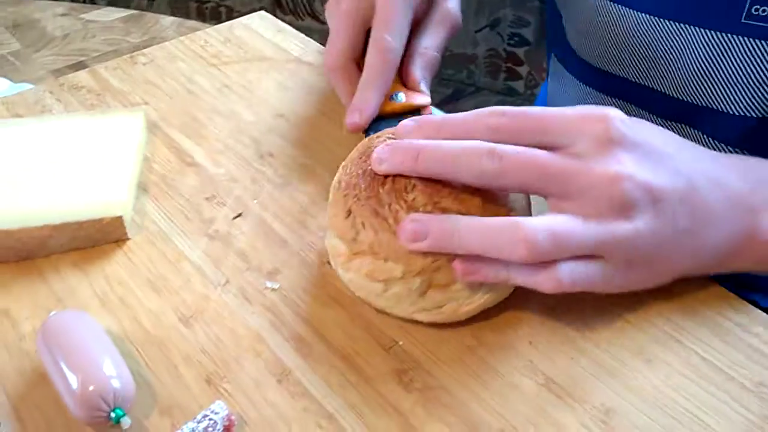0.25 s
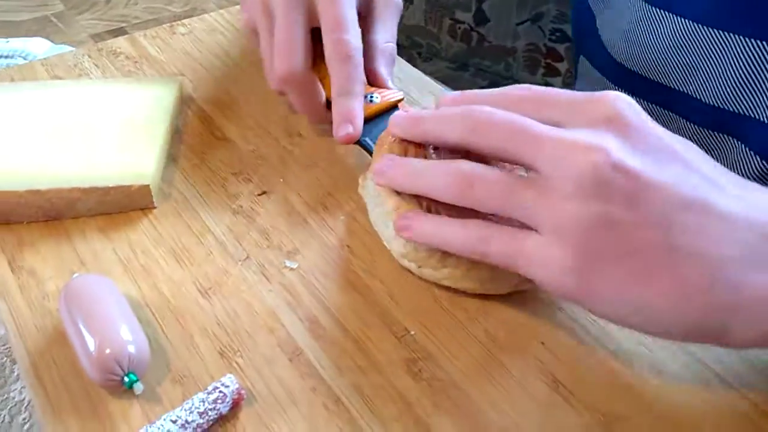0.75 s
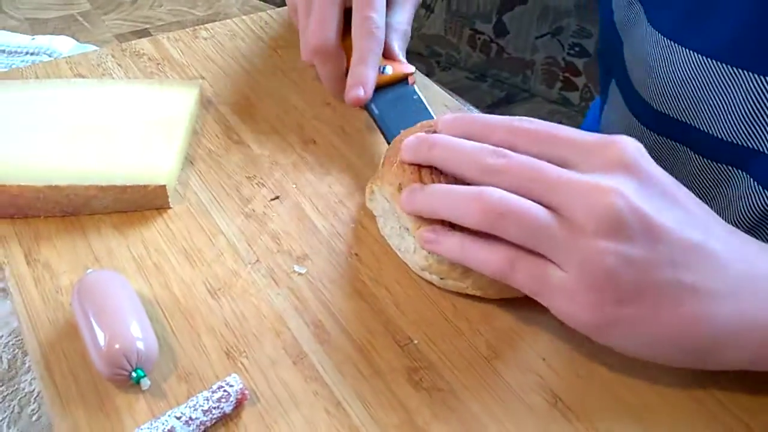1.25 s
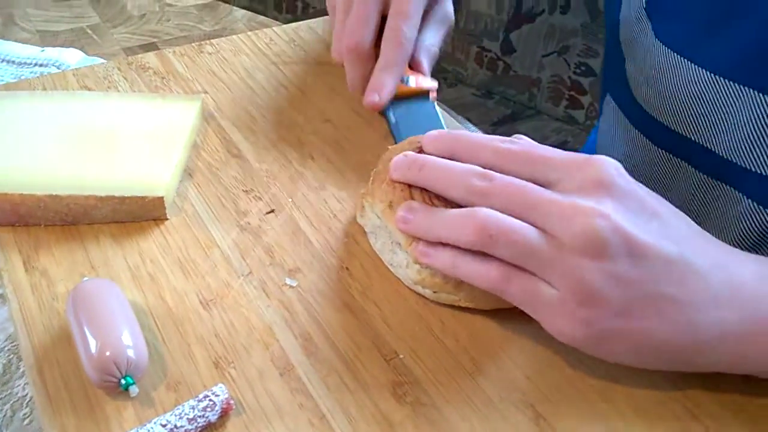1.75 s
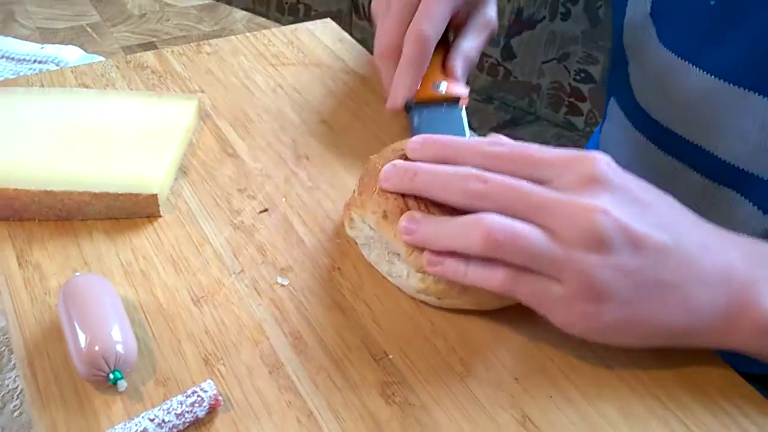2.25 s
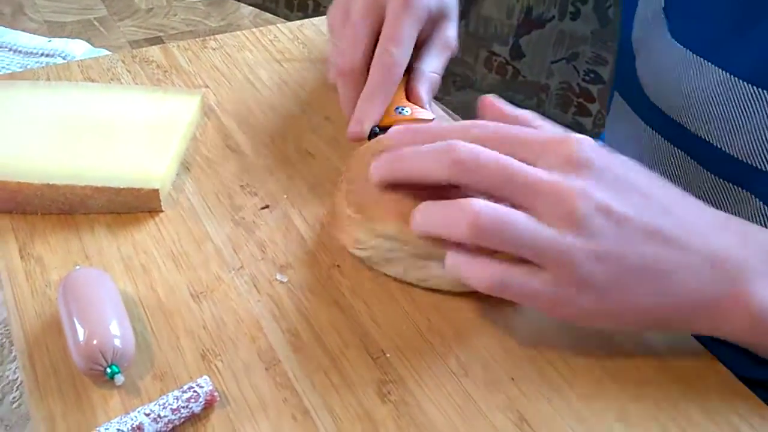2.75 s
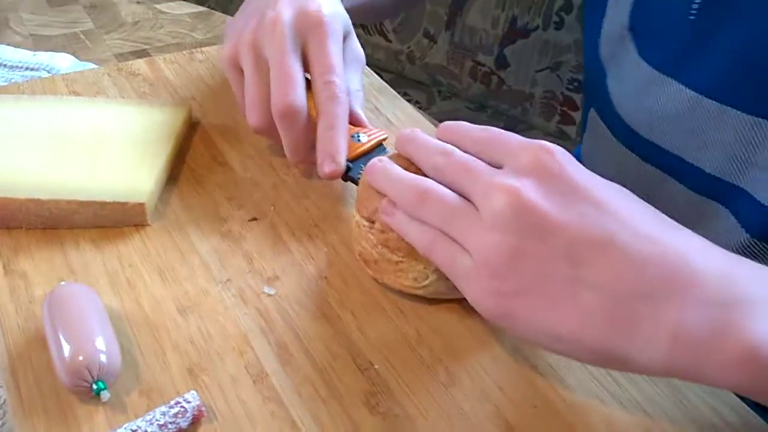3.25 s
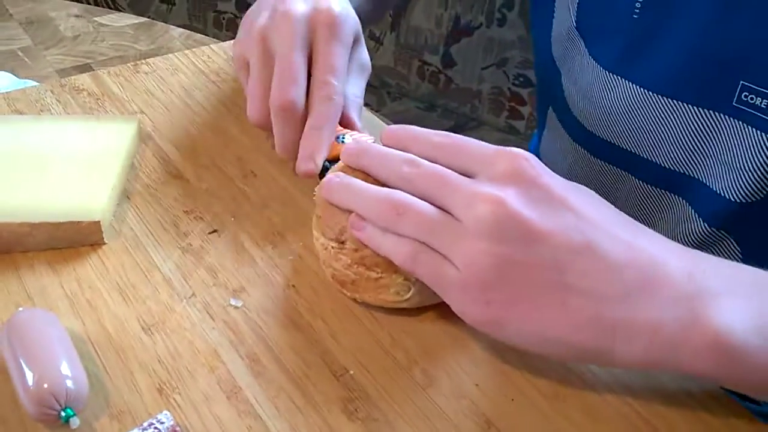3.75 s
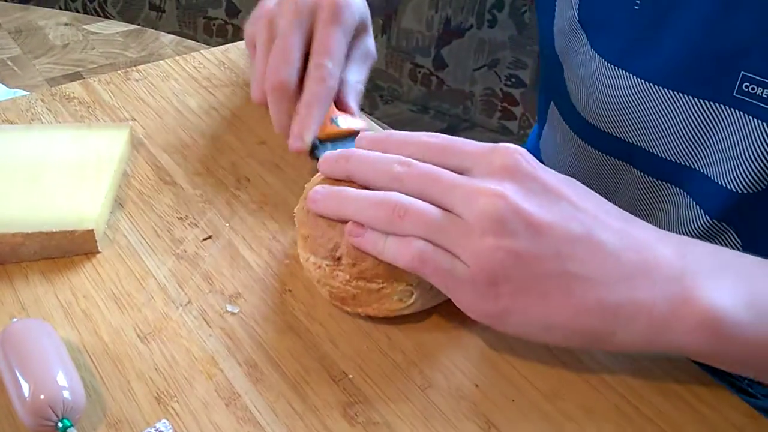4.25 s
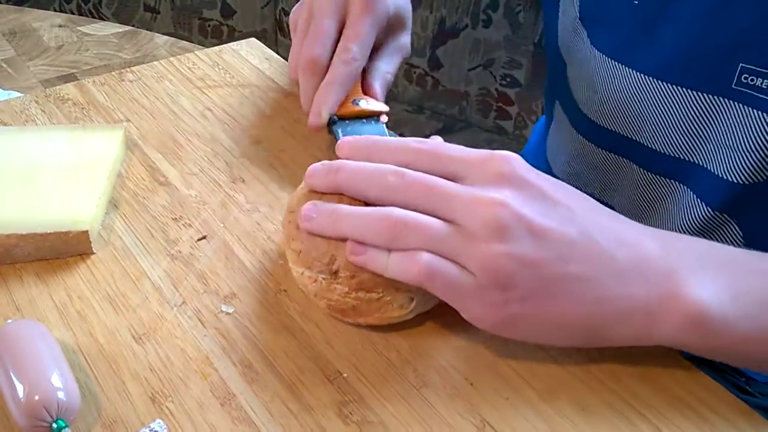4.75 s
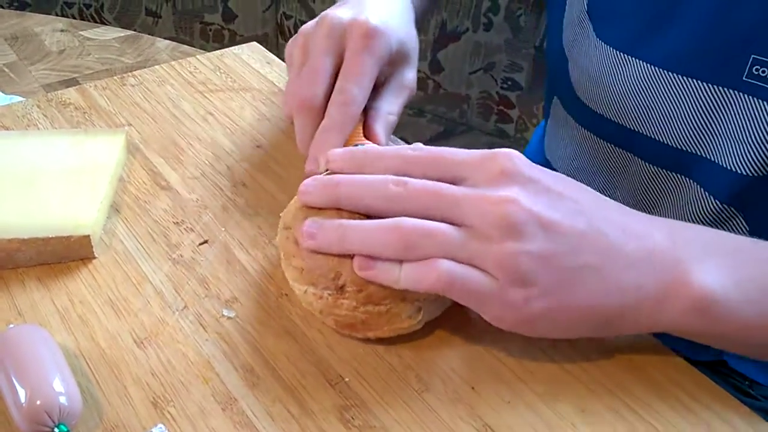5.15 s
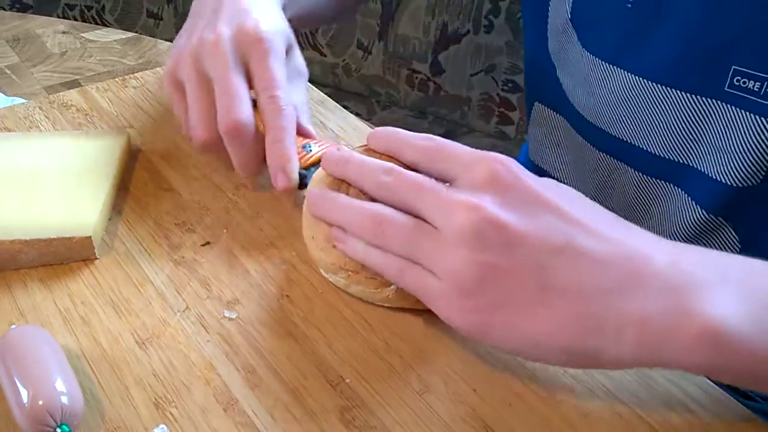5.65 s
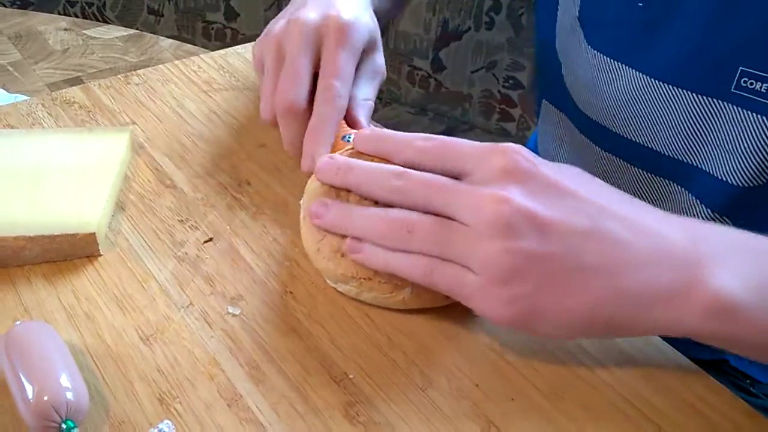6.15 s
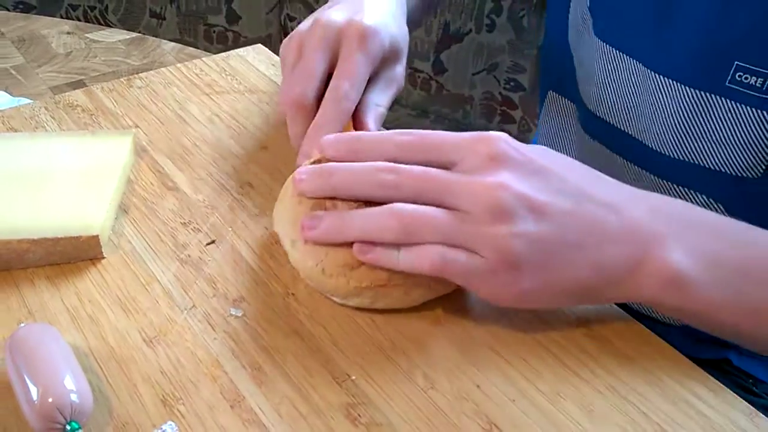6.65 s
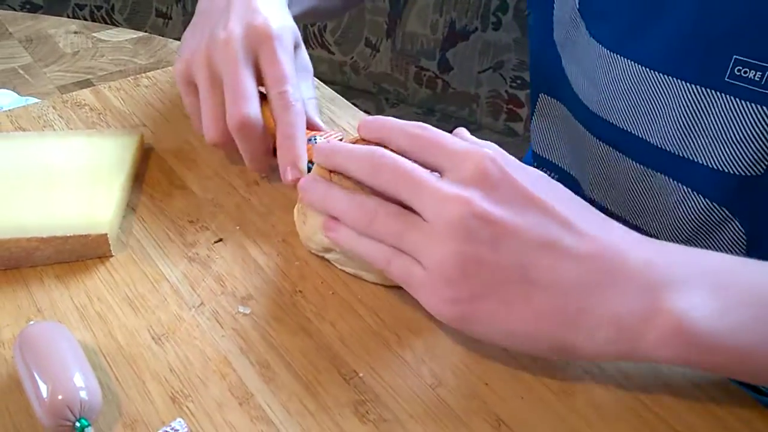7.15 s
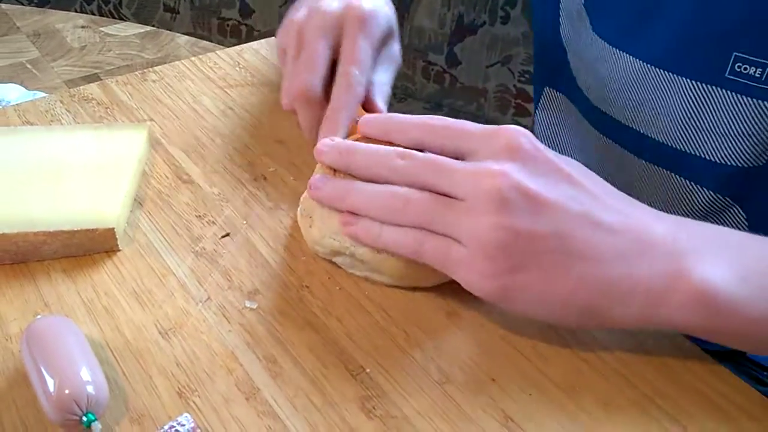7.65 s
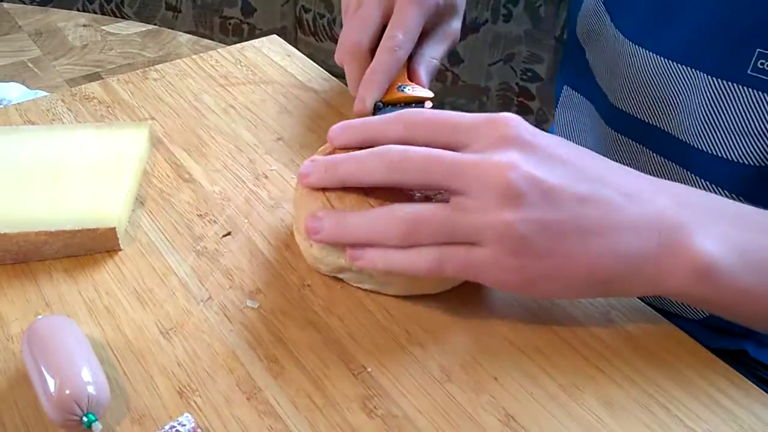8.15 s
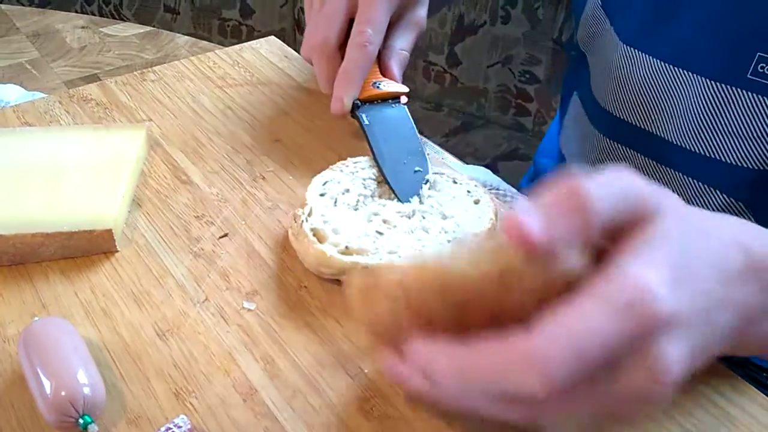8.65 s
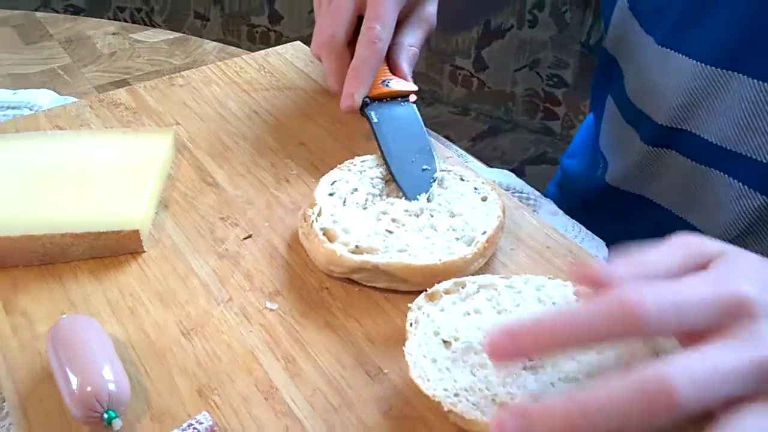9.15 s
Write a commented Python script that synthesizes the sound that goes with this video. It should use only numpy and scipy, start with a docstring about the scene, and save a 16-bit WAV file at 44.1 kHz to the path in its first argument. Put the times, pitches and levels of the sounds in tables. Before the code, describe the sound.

A serrated knife saws through a crusty bread roll on a wooden board in quick dry rasping strokes, with small creaks, crust snaps and short pauses.

```python
"""A serrated table knife saws a bread roll in half on a wooden board, in a small quiet room.
The teeth make a rasp, a hollow weight and a crust fizz: noise and tiny cracks, coloured and shaped stroke by stroke.
Slip pulses make short gliding creaks, narrow noise bands make scrapes, rubs and whistles, clicks make crust snaps.
Low dying tones are the hand and the roll bumping the board; faint reflections and a steady room tone sit around it."""
import sys
import numpy as np
from scipy import signal
from scipy.fft import rfft, irfft
from scipy.io import wavfile
from scipy.ndimage import uniform_filter1d, map_coordinates

SR = 44100
rng = np.random.default_rng(int(sys.argv[2]) if len(sys.argv) > 2 else 0)


def unload_audio(sound):
    """Save the sound as a 16-bit wav file, at the path given as the first command line argument."""
    columns = np.transpose(np.atleast_2d(sound))
    # keep every value between -1 and 1, then stretch to whole-number steps
    steps = np.round(np.clip(columns, -1, 1) * 32767)
    wavfile.write(sys.argv[1], SR, steps.astype(np.int16))


N = 414540
TIME = np.arange(N) / SR

# strokes of the blade, then the parting of the halves: (fastest moment [s], speeding up [s], slowing down [s],
# rasp level [dB], change of pressure over the stroke [dB], hollow weight of the roll relative to the rasp [dB],
# crust fizz relative to the rasp [dB], share of fine fizz [0-1]: 0 is all coarse fizz, 1 is all fine, bright fizz)
STROKES = [(0.092, 0.14, 0.088, -49.5, 5, -10.5, -11, 0.0), (0.25, 0.078, 0.22, -47, -2.5, -4, -4.5, 0.3),
           (0.694, 0.25, 0.12, -59.5, 10, -14, -1.5, 0.0), (0.938, 0.05, 0.067, -65.0, 2, -12, -7, 0.0),
           (1.088, 0.0071, 0.16, -65.5, 21.5, -7, 8, 0.3), (1.266, 0.14, 0.15, -49.5, -3, -14, -8, 0.0),
           (1.442, 0.045, 0.2, -48, 5, -13, 2, 0.38), (1.826, 0.25, 0.111, -47.5, 8, -11, -6.5, 0.31),
           (1.941, 0.048, 0.21, -46, 6, -13, -3, 0.36), (2.304, 0.189, 0.12, -48.0, -10, -13, -10, 0.0),
           (2.439, 0.042, 0.27, -44.0, -2, -19.5, -4.5, 0.51),
           (2.863, 0.24, 0.025, -56.5, 21, -15, -12.5, 0), (2.962, 0.24, 0.23, -66, 15, -12, -8, 0.8),
           (3.499, 0.22, 0.18, -51.5, -2, -20, -6, 0.43), (3.672, 0.048, 0.23, -46, -2.5, -14, -2, 0.45),
           (4.004, 0.12, 0.2, -54, 10, -10, -6.5, 0.36), (4.253, 0.07, 0.23, -42.5, 0, -13.5, -4.5, 0.56),
           (4.654, 0.22, 0.11, -47, -0.5, -11.5, -9, 0.0), (4.849, 0.14, 0.22, -42, -14, -15, -8.5, 0.11),
           (5.143, 0.193, 0.19, -71, -2, -12, -28, 0.0), (5.401, 0.132, 0.093, -53.5, 6, -16, -5.5, 0.0),
           (5.5, 0.032, 0.15, -60.5, 8, -13, -17, 0.3), (5.852, 0.23, 0.13, -49, 11.5, -17, -8, 0.15),
           (6.02, 0.11, 0.22, -45.5, -2, -12, -2.5, 0.2), (6.403, 0.22, 0.09, -46.0, 7, -10, -8.5, 0.24),
           (6.575, 0.138, 0.22, -48.5, -8.5, -9.5, -4, 0.25),
           (6.773, 0.028, 0.109, -54.5, -15, -10, -19, 0.5),
           (6.917, 0.065, 0.159, -54.5, -1, -16, -1.5, 0.0),
           (7.073, 0.04, 0.15, -65.5, -4.5, -16, -22, 0.2), (7.456, 0.22, 0.087, -51, -4, -14, -6.5, 0.12),
           (7.591, 0.11, 0.28, -54, 3.5, -8, -2.5, 0.34), (7.898, 0.078, 0.214, -56, 2, -11, -15, 1.0),
           (8.162, 0.056, 0.25, -65.5, 1, -13, -20, 0.3), (8.468, 0.008, 0.092, -78, 15, -13, -18, 0.1),
           (8.597, 0.023, 0.082, -63.5, -5, -14, 0.5, 0.47), (8.805, 0.165, 0.07, -59, 18, -20, -5, 0.075),
           (8.865, 0.008, 0.08, -58, 4, -21, -9, 0.0), (9.395, 0.039, 0.02, -54, 13, -24, -9, 0.0)]
# stick-slip creaks: (loudest moment [s], swell [s], fade [s], first slip rate [Hz], last slip rate [Hz],
# level [dB], roughness [0-1])
CREAKS = [ (.213, 0.0034, 0.0156, 259, 338, -41.5, .12), (.234, 0.02, 0.004, 368, 710, -30, 0.02),
          (.244, .006, 0.026, 595, 696, -46, 0), (.359, .007, 0.019, 291, 270, -42, 0.04),
          (1.336, 0.0073, 0.007, 1700, 1264, -41, 0.21), (1.426, 0.013, 0.017, 696, 1164, -37, 0.14),
          (1.682, 0.025, .012, 201, 338, -49.5, .1), (1.708, 0.022, .021, 449, 698, -43, 0.39),
          (1.851, 0.0075, 0.025, 996, 590, -35.5, .2), (1.946, 0.016, 0.0098, 1120, 1600, -42, 0.09),
          (2.051, 0.0041, 0.019, 1465, 1110, -43.5, 0.21), (2.453, 0.028, .016, 1287, 1423, -33.5, 0.08),
          (2.461, .015, 0.034, 604, 1450, -34, 0.06), (2.618, .014, 0.0067, 393, 172, -45.5, .25),
          (3.548, 0.015, 0.029, 1055, 546, -43, 0.33), (3.672, 0.019, 0.026, 898, 1600, -38.5, 0.28),
          (4.122, .008, 0.0085, 640, 538, -45, 0.23), (4.232, .005, 0.02, 995, 1260, -34.5, 0.2),
          (4.254, .020, .022, 261, 478, -34, 0.3), (4.292, .0055, 0.0104, 2326, 2250, -36, .1),
          (4.372, .0031, 0.0061, 612, 257, -39, 0.29), (4.641, .010, .034, 885, 607, -37.5, .14),
          (4.822, 0.057, .0093, 433, 1762, -35, 0.11), (4.857, .043, 0.00536, 675, 1556, -31.5, 0.09),
          (4.938, 0.014, 0.026, 454, 202, -45.5, 0.31), (5.847, 0.0053, 0.034, 1522, 616, -35, 0.06),
          (5.868, .011, 0.02, 2050, 1007, -36.5, 0.11), (5.986, .010, 0.024, 322.7, 414, -36.5, 0.3),
          (6.116, .003, 0.024, 345.3, 201, -41.5, 0.45), (6.409, 0.0058, .014, 1670, 760, -34, 0.06),
          (6.537, .016, 0.011, 453, 551, -36.5, .17), (6.666, .02, .03, 477, 260, -45.5, .35),
          (7.442, 0.012, 0.019, 1350, 1750, -42.5, 0.18), (7.553, 0.029, 0.021, 208.5, 431, -38, 0.13),
          (7.72, .012, 0.034, 486, 260, -46.5, 0.4)]
# short bursts of noise round one pitch, as crust scrapes, low rubs and knocks, high blade whistles:
# (loudest moment [s], length [s], pitch [Hz], level [dB])
NOISE_BURSTS = [(.09, .062, 3100, -48), (.134, .02, 1800, -50), (.65, .08, 2820, -61),
                (0.694, 0.04, 6600, -62), (1.49, 0.026, 9200, -48), (2.026, 0.12, 2250, -49),
                (2.891, 0.12, 900, -63.5), (3.681, .044, 2760, -42), (4.258, 0.042, 3400, -40),
                (4.667, 0.044, 3630, -45.5), (4.859, .019, 9600, -50), (5.876, 0.038, 2670, -49),
                (6.38, 0.13, 2650, -49), (7.448, 0.043, 3100, -47), (7.99, .03, 1600, -55),
                (8.396, .035, 660, -63), (8.882, 0.024, 2900, -59.5)]
# crust snaps: (time [s], peak level [dB], crispness [0-1])
SNAPS = [(0.534, -42, .3), (1.088, -47, 1), (1.63, -45, 0), (2.866, -43, 0.8), (3.279, -51, .3),
         (3.379, -44.5, 0), (4.219, -32, 0.4), (4.231, -32, .3), (4.434, -40.5, 0), (4.923, -32, .1),
         (5.283, -44, 0), (6.203, -45, 0.1), (7.239, -51, .6), (7.878, -42, .3), (7.975, -35, 0),
         (8.249, -51, 0.6), (8.382, -47, 0.76), (8.793, -34.5, .3)]
# bumps on the board: (time [s], level [dB], settled pitch [Hz], t60 [s])
BUMPS = [(0.767, -45.5, 46.4, 0.26), (3.056, -49, 56, 0.17), (3.079, -30, 41.3, 0.22),
         (3.155, -39, 33.2, 0.36), (3.194, -52, 110, 0.07), (3.806, -46, 85.5, 0.1), (4.99, -45, 55, 0.1),
         (5.598, -46, 43.7, 0.22), (6.123, -43.5, 92, 0.2), (6.146, -40.5, 42.4, 0.27),
         (8.776, -46, 46.4, 0.62), (9.136, -41.5, 91, 0.05)]
# resonances of roll, blade and board: (centre [Hz], width [Hz], lift [dB])
BODY_RESONANCES = [(270, 117, 6), (373, 72, 3), (521, 15, 7), (590, 13, -1), (640, 23, 1.5), (785, 25, 5.5),
                   (900, 117, 4), (1210, 58, 0), (1250, 120, 2), (1357, 68, 4.5), (1450, 49, 6),
                   (1537, 34, 4), (1600, 184, 7), (1705, 31, 4), (1925, 20, 6.5), (2066, 124, 3),
                   (2500, 38, 3), (2820, 63, 4.5), (3094, 87, 4), (3494, 140, 5), (3920, 220, 3),
                   (5380, 310, 3), (5960, 240, 4.5)]
# colour of the teeth in crust and crumb: (frequency [Hz], relative level [dB])
RASP_COLOUR = [(200, -48.5), (480, -13.5), (740, 1), (1100, 2), (1550, 0), (1800, 0.5), (2300, 1.5),
               (2650, -4.5), (3300, -10.5), (4000, -12.5), (5500, -19), (12000, -61)]
# colour of the hollow roll: (frequency [Hz], relative level [dB])
HOLLOW_COLOUR = [(100, -27.5), (180, -11), (270, -5), (450, -6.5), (560, -2.5), (680, 0), (900, -13),
                 (2500, -41.5)]
# colour of the coarse crust fizz: (frequency [Hz], relative level [dB])
COARSE_FIZZ_COLOUR = [(1200, -20.5), (2800, 7), (4000, -2.5), (5500, -1), (7300, -0.5), (9200, -1),
                      (10800, -13.5), (13000, -19), (16000, -24)]
# colour of the fine crust fizz: (frequency [Hz], relative level [dB])
FINE_FIZZ_COLOUR = [(1200, -24), (2500, -3), (4000, 2.5), (5500, -3), (7300, -2.5), (9100, 0.5),
                    (10500, -2), (12500, -7), (14000, -13), (16000, -25)]
# colour of the creaking blade: (frequency [Hz], relative level [dB])
CREAK_COLOUR = [(80, -22), (250, -5.5), (600, 4.5), (1000, 2.5), (1450, -0.5), (1900, -2.5), (2600, -7.5),
                (4000, -16.5), (9000, -16.5), (16000, -47)]
# colour of breaking crust: (frequency [Hz], relative level [dB])
SNAP_COLOUR = [(100, -34), (500, -2), (1000, 8.5), (1500, 7.5), (2500, -2.5), (4500, -7.5), (8000, -17),
               (16000, -28.5)]
# colour of the thrumming board: (frequency [Hz], relative level [dB])
THRUM_COLOUR = [(40, -19), (90, 5), (140, 8.5), (220, -9.5), (400, -44), (1500, -58)]
# colour of the room tone: (frequency [Hz], relative level [dB per Hz])
ROOM_TONE_COLOUR = [(12, -7.5), (20, 6.5), (52, 1.5), (129, -10), (282, -13.5), (465, -20.5), (881, -20.5),
                    (1200, -26.5), (1540, -26), (1870, -25.5), (2150, -25.5), (2540, -29.5), (5850, -28.5),
                    (7730, -39), (15500, -37.5)]
# decay of the reflections: (frequency [Hz], t60 [s])
ROOM_DECAY = [(150, 0.38), (1500, 0.16), (5000, 0.3), (14000, 0.017)]


def amp(db):
    """Decibels to gain."""
    return 10 ** (np.asarray(db) / 20)


def evened(x):
    """Scales to rms 1."""
    return x / np.sqrt(np.mean(x ** 2) + 1e-20)


def read(points, hz):
    """Reads a table along a log-frequency axis."""
    f, value = np.transpose(points)
    return np.interp(np.log(hz + 1), np.log(f + 1), value)


def add(mix, s, sound):
    """Mixes a sound in at time s."""
    part = mix[max(round(s * SR), 0):][:len(sound)]
    part += sound[:len(part)]


def wander(length, hz):
    """Smooth chance of rms 1 that changes about hz times a second."""
    at = np.arange(length) * hz / SR
    return evened(np.interp(at, np.arange(length), rng.standard_normal(length)))


def room_tone(level_db=-62):
    """Steady low rumble and faint hiss: noise given one fixed colour."""
    colour = amp(read(ROOM_TONE_COLOUR, np.fft.rfftfreq(N, 1 / SR)))
    noise = rng.standard_normal(N)
    return amp(level_db) * evened(irfft(rfft(noise) * colour, N))


def room(x, wet_db=-15, gap_s=0.0034):
    """Dense faint reflections off table and walls, the top treble dying first."""
    length = SR // 2
    taps = rng.standard_normal(length) * (TIME[:length] > gap_s)
    hz, t, bands = signal.stft(taps, SR, nperseg=256)
    decay = np.exp(-np.log(1000) * t / read(ROOM_DECAY, hz)[:, None])
    tail = signal.istft(bands * decay, SR)[1]
    return x + amp(wet_db) * signal.oaconvolve(x, tail / np.linalg.norm(tail))[:N]


def body(colour, size=4096):
    """Causal response to one click: a broad colour lifted at the resonances of roll, blade and board."""
    hz = np.fft.rfftfreq(size, 1 / SR)
    db = read(colour, hz)
    for f, width, lift in BODY_RESONANCES:
        db = db + lift / (1 + (2 * (hz - f) / width) ** 2)
    log_gain = np.log(amp(np.r_[db, db[-2:0:-1]]))
    minimum_phase = np.exp(np.conj(signal.hilbert(log_gain)))
    return np.fft.ifft(minimum_phase).real[:size // 2]


def ring(drive, colour):
    """Passes a drive through the body."""
    return signal.oaconvolve(drive, body(colour))[:len(drive)]


def bumps(rise_s=0.002, sag=0.85, sag_s=0.0073, knock=0.15, knock_s=0.008):
    """Board and table give a dull low shudder, stiffer and knocking for the first instant of contact."""
    out, t = np.zeros(N), np.arange(SR // 2) / SR
    for s, db, hz, t60 in BUMPS:
        # the pitch starts high and sags to its settled value
        turns = np.cumsum(hz * (1 + sag * np.exp(-t / sag_s))) / SR
        shudder = np.exp(-np.log(1000) * t / t60) * np.sin(2 * np.pi * turns)
        thud = evened(ring(rng.standard_normal(len(t)), THRUM_COLOUR))
        contact = knock * thud * np.exp(-t / knock_s)
        add(out, s, amp(db) * (1 - np.exp(-t / rise_s)) * (shudder + contact))
    return out


def snaps(splinter=0.27, spray_s=0.0014, size=2048):
    """A flake of crust breaks: one click and a quickly dying spray of splinters."""
    out, t = np.zeros(N), np.arange(size) / SR
    for s, db, crisp in SNAPS:
        spray = splinter * rng.standard_normal(size) * np.exp(-t / spray_s)
        snap = ring((t == 0) + spray, SNAP_COLOUR)
        snap = signal.lfilter([1, -np.clip(crisp, 0, 1)], [1], snap)  # dry, thin flakes have less bass
        add(out, s, amp(db) * snap / abs(snap).max())
    return out


def creaks(curve=0.86, uneven=0.73, jitter_hz=900, softest=0.79, sharpness=30, sharpest_hz=8000, size=8192):
    """The blade's flank sticks and slips in the crumb: one pulse a slip, at a gliding, jittery rate."""
    out, t = np.zeros(N), np.arange(size) / SR
    for s, swell, fade, first_hz, last_hz, db, rough in CREAKS:
        glide = np.interp(t, [0, swell + fade], [first_hz, last_hz])
        rate = glide * np.exp(rough * wander(size, jitter_hz))
        turns = np.cumsum(rate) / SR
        # each whole turn is one slip, placed between samples
        places = np.interp(np.arange(1, turns[-1]), turns, np.arange(size))
        places = places[places < (swell + fade) * SR]
        force = np.exp(uneven * rough * rng.standard_normal(size)[:len(places)])
        force *= np.interp(places / SR, [0, swell, swell + fade], [0, 1, 0]) ** (curve / 2)
        pulses = force @ np.sinc(np.arange(size) - places[:, None])
        slips = ring(pulses, CREAK_COLOUR)
        # fast, rough slips are the sharpest; soft crumb lets go slowly
        sharp_hz = min((softest + sharpness * rough) * (first_hz + last_hz) / 2, sharpest_hz)
        pole = np.exp(-2 * np.pi * sharp_hz / SR)
        slips = signal.lfilter([1], np.poly([pole, pole]), slips)
        loudest = np.sqrt(uniform_filter1d(slips ** 2, size=400).max())
        add(out, s - swell, amp(db) * slips / loudest)
    return out


def noise_bursts(width=0.41):
    """Scrapes, rubs, knocks and whistles: noise gathered round one pitch; width is a share of that pitch."""
    length = SR // 2
    out, hz, t = np.zeros(N), np.fft.rfftfreq(length, 1 / SR), np.arange(length) / SR
    middle = t.mean()
    for s, length_s, pitch_hz, db in NOISE_BURSTS:
        band = 1 / (1 + ((hz - pitch_hz) / (width * pitch_hz)) ** 2) ** 2
        noise = evened(irfft(rfft(rng.standard_normal(length)) * band, length))
        swell = np.exp(-(2 * (t - middle) / length_s) ** 2)
        add(out, s - middle, amp(db) * noise * swell)
    return out


def blade(running_speed=0.72, hollow_power=0.5, fizz_power=2.5):
    """Each stroke speeds up and slows to rest in one arch, driving rasp, hollow weight, coarse and fine fizz."""
    power = np.zeros((4, N))
    for s, rise, fall, db, press_db, hollow_db, fizz_db, fine in STROKES:
        now = (TIME > s - rise) & (TIME < s + fall)
        t = TIME[now] - s
        speed = np.cos(np.pi / 2 * np.interp(t, [-rise, 0, fall], [-1, 0, 1]))
        # the rasp levels off once the teeth run (running_speed is a share of the stroke's top speed)
        running = speed ** 2 * (1 + running_speed ** 2) / (speed ** 2 + running_speed ** 2)
        pressure = amp(db + press_db * t / (rise + fall))
        rasp = pressure * running
        hollow = pressure * amp(hollow_db) * running ** hollow_power  # the roll answers almost at once
        fizz = amp(db + fizz_db) * speed ** fizz_power  # the crust fizzes only near full speed
        fine = np.clip(fine, 0, 1)
        power[:, now] += np.square([rasp, hollow, (1 - fine) * fizz, fine * fizz])
    return np.sqrt(power)


def crumble(per_s, spread_db, rub):
    """Many tiny fractures of uneven size over the smooth rubbing of the blade."""
    size = amp(spread_db * np.minimum(rng.exponential(1, N), 4))
    cracks = size * rng.choice([-1, 1], N) * (rng.random(N) < per_s / SR)
    return evened(evened(cracks) + rub * rng.standard_normal(N))


def drifting(x, drift_db, drift_hz, size=512, count=12):
    """The blade's contact point travels, so broad bands swell and sink independently."""
    hz, t, z = signal.stft(x, SR, nperseg=size)
    bands = rng.standard_normal((count, int(t[-1] * drift_hz) + 2))
    place = np.meshgrid(np.sqrt(hz / hz[-1]) * (count - 1), t * drift_hz, indexing="ij")
    drift = map_coordinates(bands, place, order=1)
    return signal.istft(z * amp(drift_db * drift), SR)[1][:N]


def sawing(thrum_db=-18, crackle_db=-10, catch_db=1.42, catch_hz=130, flutter_db=1.03, flutter_hz=35):
    """Teeth break crust and crumb; the bite wavers as they catch and come free, and the board thrums under the roll."""
    rasp, hollow, coarse, fine = blade()
    bite = evened(amp(catch_db * wander(N, catch_hz)))

    tearing = drifting(bite * crumble(per_s=3000, spread_db=0.5, rub=0.76), drift_db=3.0, drift_hz=24.48)
    crumb = evened(ring(tearing, RASP_COLOUR))
    flakes = evened(ring(crumble(per_s=140, spread_db=1.5, rub=0), SNAP_COLOUR))
    teeth = rasp * (crumb + amp(crackle_db) * flakes)

    crust = crumble(per_s=7000, spread_db=3.0, rub=1.5) * np.sqrt(bite)
    crust = drifting(crust, drift_db=2.4, drift_hz=16)
    fizz = fine * evened(ring(crust, FINE_FIZZ_COLOUR))
    fizz += coarse * evened(ring(crust, COARSE_FIZZ_COLOUR))

    tugs = bite * crumble(per_s=900, spread_db=4.5, rub=0.54)
    weight = hollow * evened(ring(tugs, HOLLOW_COLOUR))
    thrum = amp(thrum_db) * rasp * evened(ring(tugs, THRUM_COLOUR))

    flutter = evened(amp(flutter_db * wander(N, flutter_hz)))  # the crust is uneven along the cut
    return flutter * (teeth + fizz + weight + thrum)


def scene():
    """Knife and roll with the room's reflections, over the dry bumps of the board and the room tone."""
    cutting = sawing() + noise_bursts() + creaks() + snaps()
    return (room(cutting) + bumps() + room_tone())[None]


def record(dry, edge_hz=15750):
    """The recorder's band limit: a steep low-pass takes off the top treble."""
    low_pass = signal.firwin(511, edge_hz, window=("kaiser", 9), fs=SR)
    return signal.oaconvolve(dry, low_pass[None], "same")


dry = scene()
out = record(dry)
unload_audio(out)
```